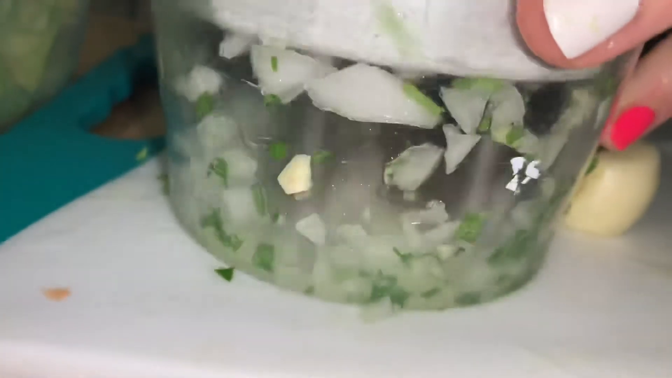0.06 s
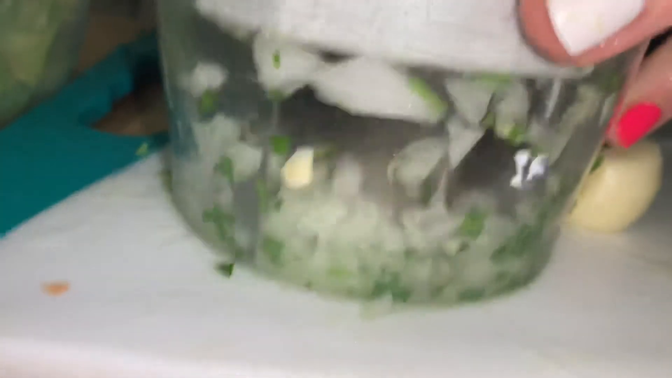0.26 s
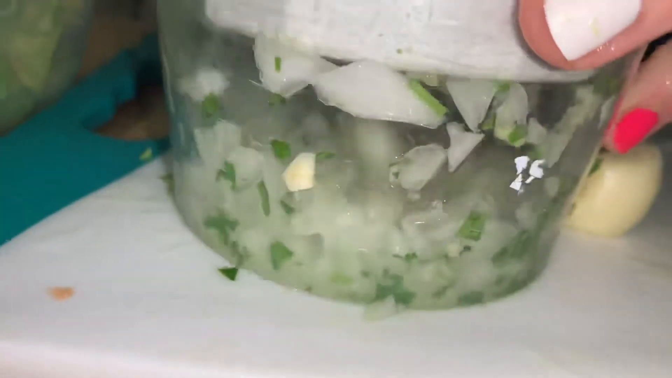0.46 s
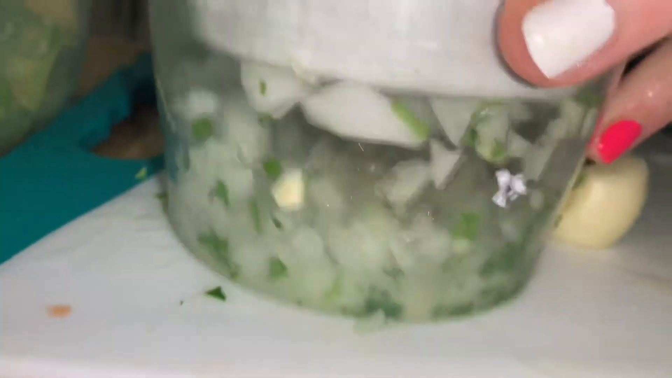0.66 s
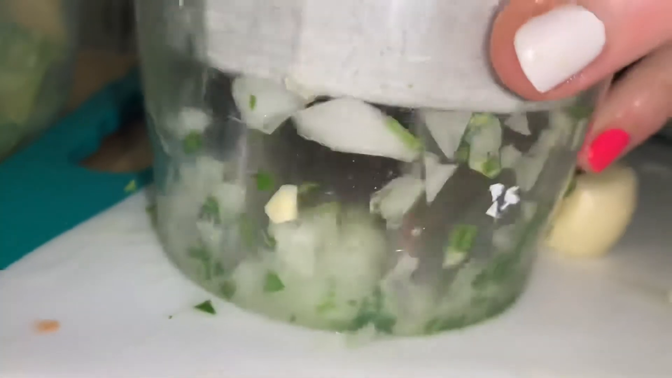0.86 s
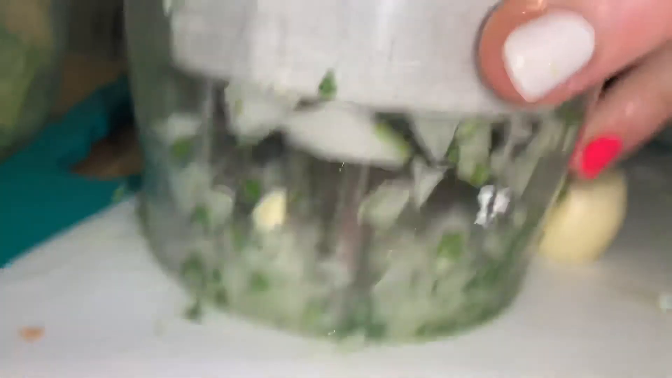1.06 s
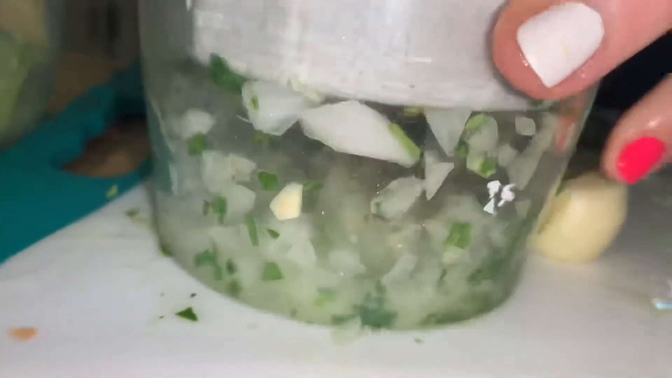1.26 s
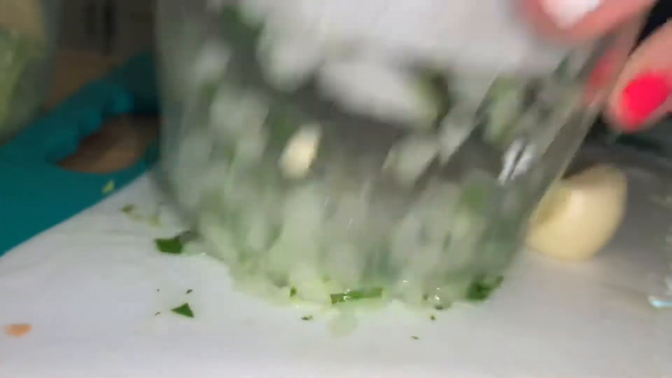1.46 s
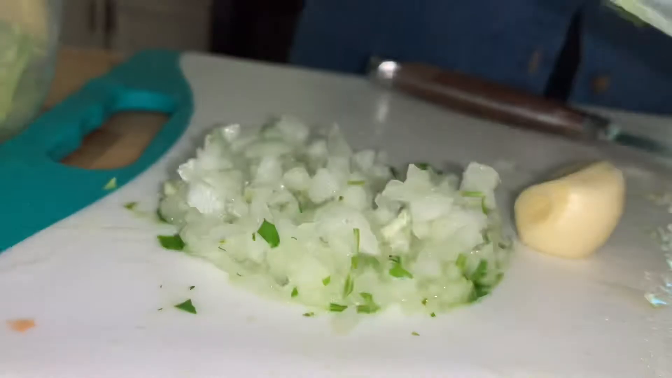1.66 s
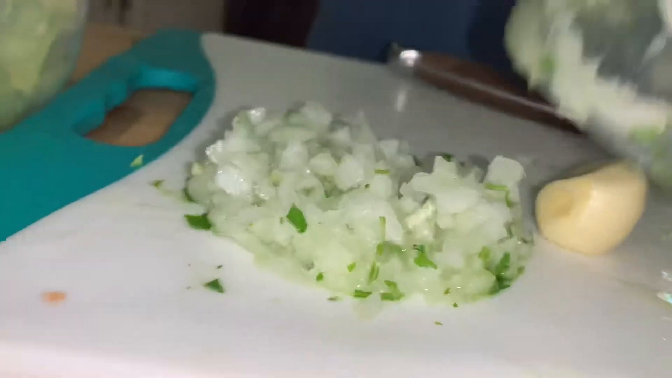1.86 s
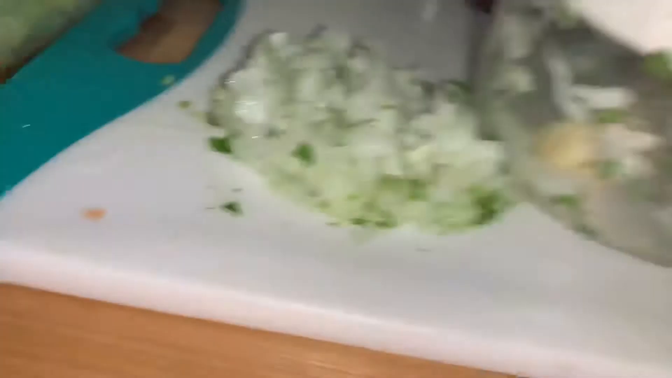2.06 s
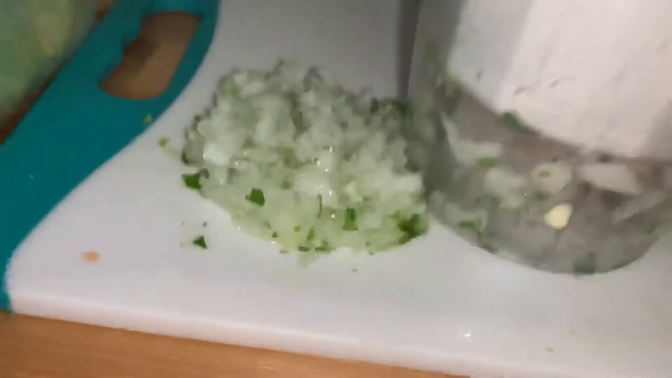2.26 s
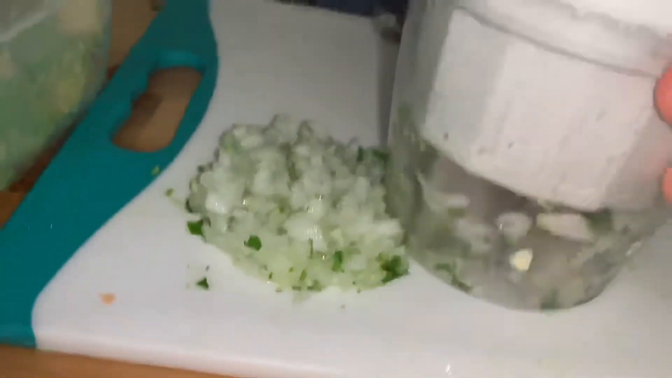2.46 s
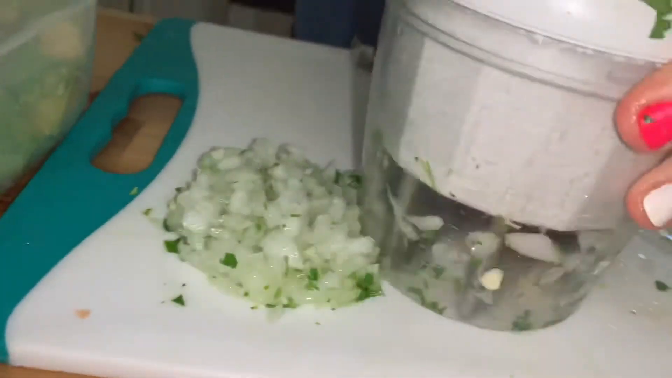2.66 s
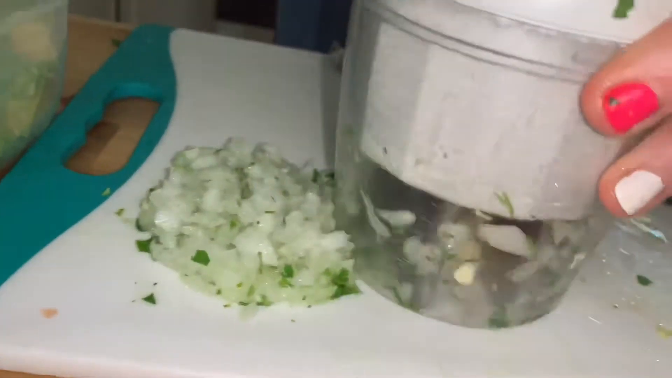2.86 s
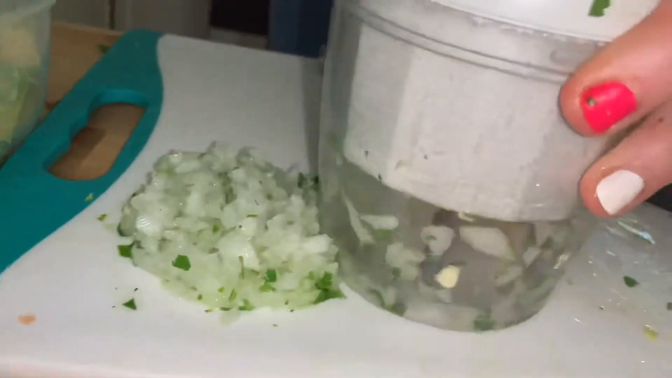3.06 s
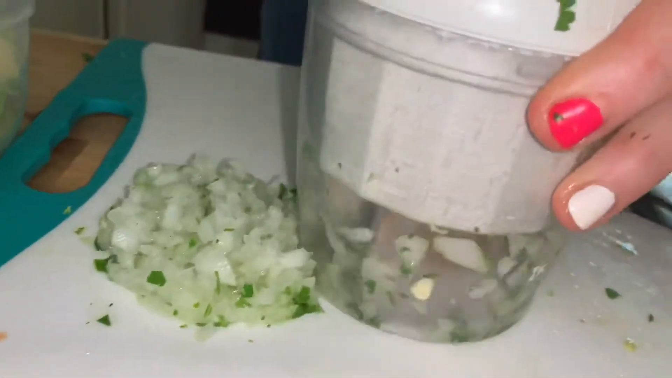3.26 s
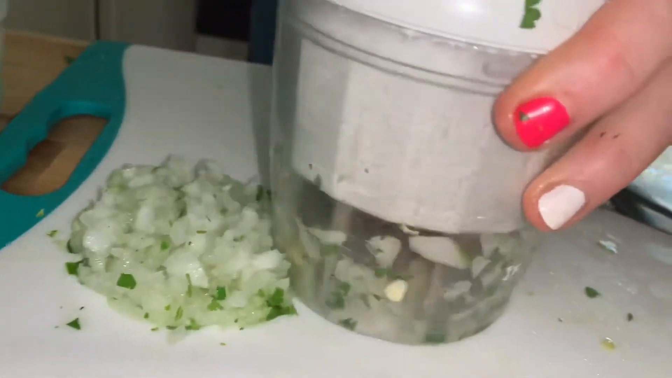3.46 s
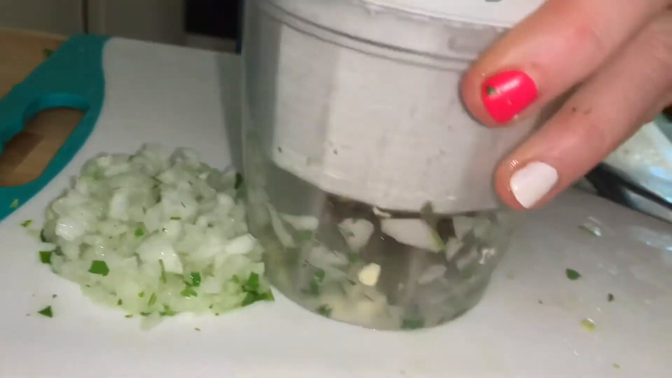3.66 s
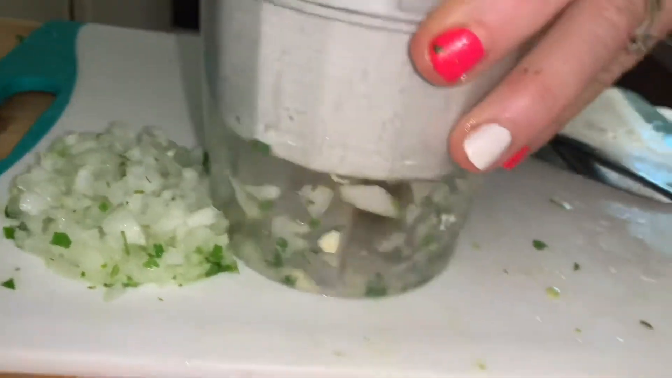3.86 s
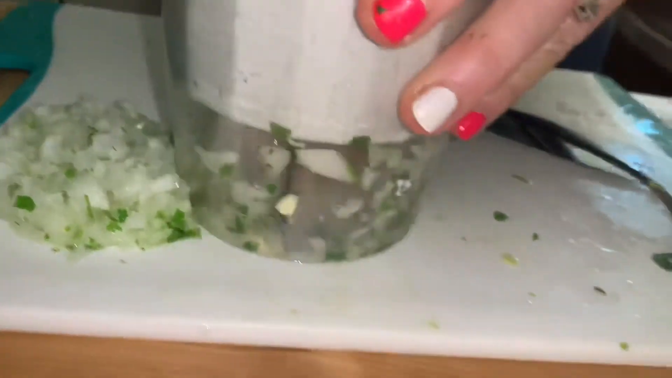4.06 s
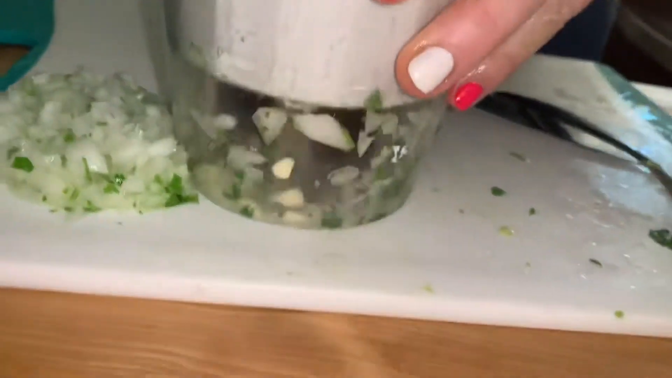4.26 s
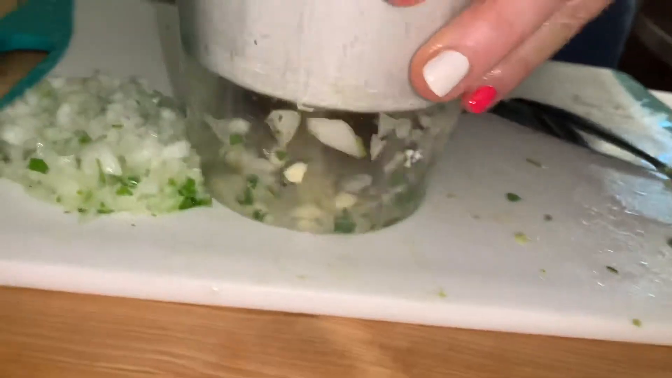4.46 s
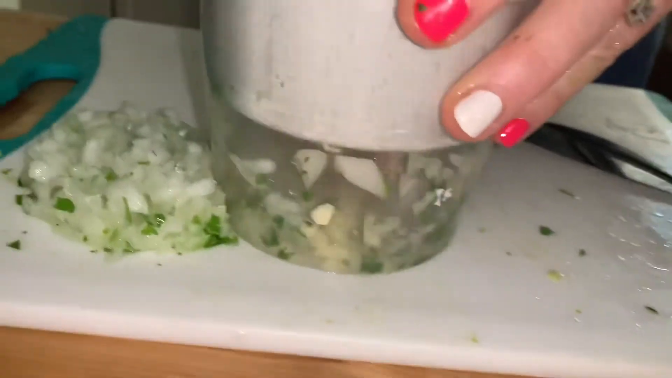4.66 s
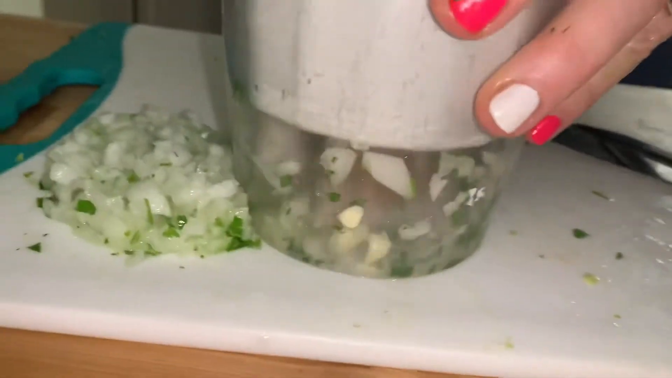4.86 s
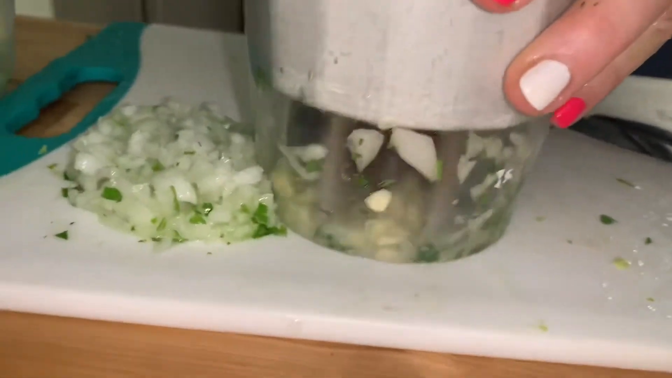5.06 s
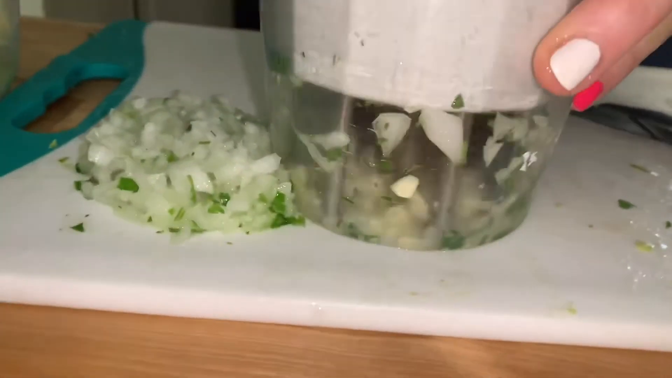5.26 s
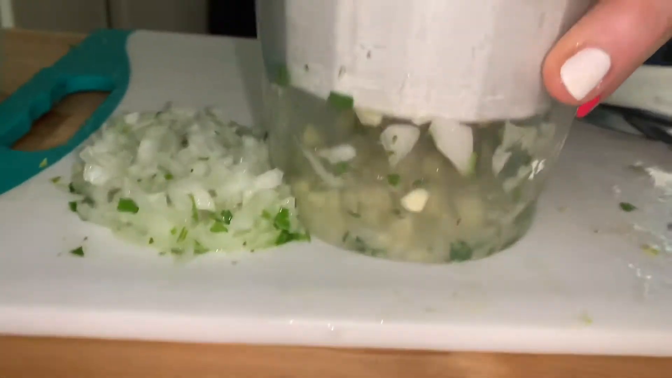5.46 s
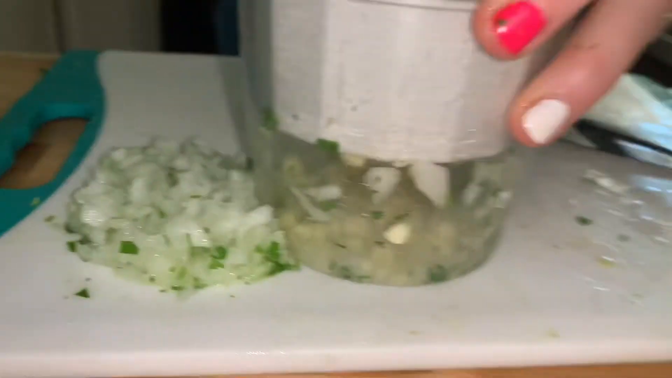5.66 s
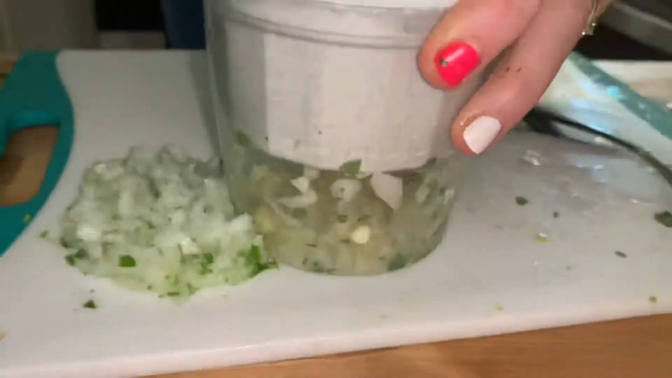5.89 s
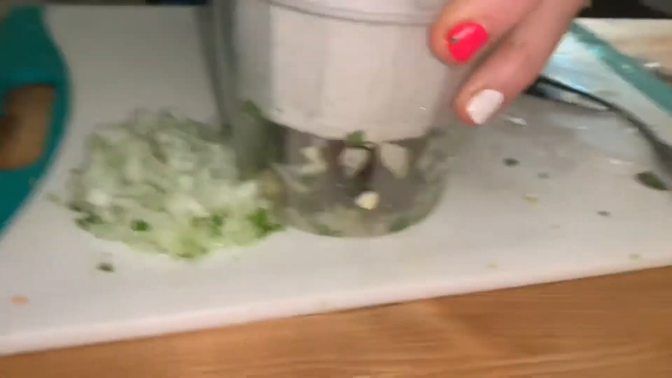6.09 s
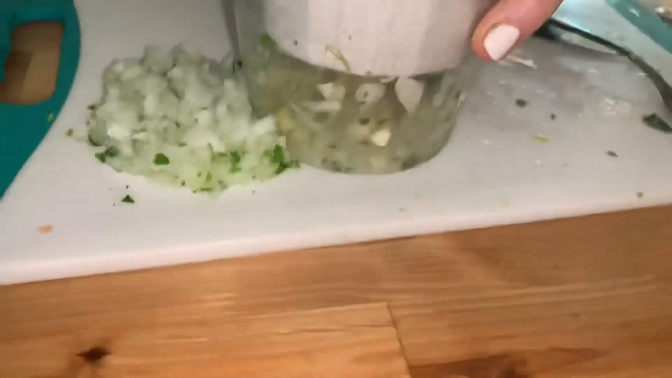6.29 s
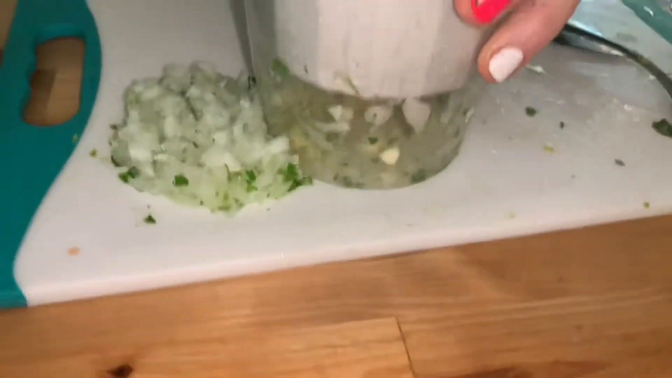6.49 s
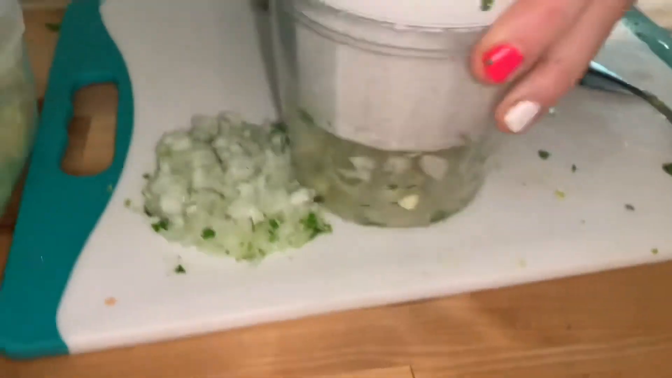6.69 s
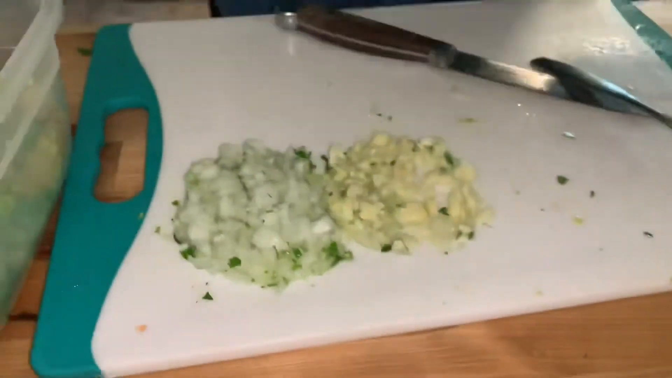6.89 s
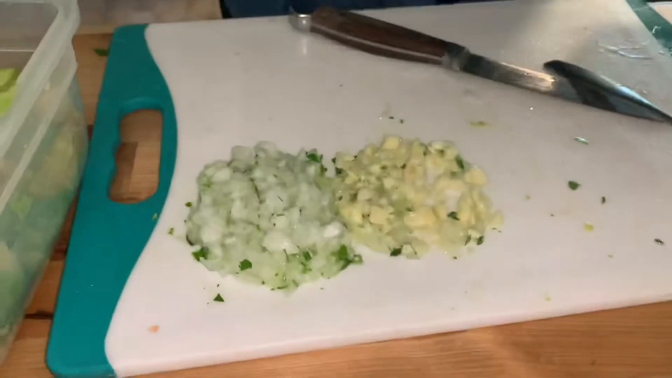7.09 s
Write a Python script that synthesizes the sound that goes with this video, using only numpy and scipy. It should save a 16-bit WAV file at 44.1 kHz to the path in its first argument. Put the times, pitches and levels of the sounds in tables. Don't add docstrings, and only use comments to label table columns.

```python
import sys
import numpy as np
from scipy import signal
from scipy.fft import rfft, irfft, next_fast_len
from scipy.io import wavfile
from scipy.ndimage import uniform_filter1d

SR = 44100
rng = np.random.default_rng(int(sys.argv[2]) if len(sys.argv) > 2 else 0)


def field_ratio(decibels):
    return 10 ** (np.asarray(decibels, dtype=float) / 20)


def store_wav(level_fs):
    pcm = np.round(np.clip(np.atleast_2d(level_fs), -1, 1) * 32767)
    wavfile.write(sys.argv[1], SR, pcm.T.astype(np.int16))


N = 314433
LEAD = SR // 5

# t/s, crack 1-3 kHz level/dB, knock 300-900 Hz level/dB,
# snap over 4 kHz level/dB, board thud level/dB
CHOPS = [(-.045, -18, -16, -22, -9), (0.2145, -16, -11, -22, -9.9), (0.4869, -15, -15, -28, -8.9),
         (0.7498, -16, -14, -25, -8.6), (1.0177, -16, -17, -24, -11.1), (2.2249, -13, -14, -20, -7.7),
         (2.4454, -13, -21, -18, -6.6), (2.6345, -16, -14, -19, -8.2), (2.83, -16, -10, -17, -9.8),
         (3.0246, -12, -16, -18, -8.8), (3.2282, -13, -18, -16, -9.5), (3.4112, -14, -19, -20, -8.4),
         (3.6163, -17, -16, -16, -7.5), (3.8098, -14, -18, -21, -7.8), (4.0089, -16, -11, -20, -11),
         (4.2005, -15, -11, -19, -9.9), (4.384, -18, -10, -19, -8.8), (4.5736, -12, -22, -17, -8.4),
         (4.7662, -13, -24, -21, -9.9), (4.9877, -12, -21, -19, -8.3), (5.2171, -15, -17, -21, -7.5),
         (5.6641, -14, -11, -20, -10.1), (6.0707, -13, -16, -19, -11), (6.5102, -16, -15, -20, -8.8)]
SET_DOWN = (1.959, -27, -23, -38, -20.7)
RETURNS = [(0.0848, -15, -16, -16, -27), (0.3597, -16, -12, -18, -24), (0.6316, -18, -19, -17, -22),
           (0.8925, -18, -18, -22, -25), (1.1813, -19, -16, -17, -29), (2.3048, -26, -25, -21, -35),
           (2.5322, -21, -18, -19, -26), (2.7278, -23, -19, -22, -26), (2.9219, -23, -19, -20, -31),
           (3.1214, -25, -24, -20, -30), (3.3195, -19, -18, -19, -25), (3.5255, -23, -24, -24, -32),
           (3.7121, -23, -27, -25, -30), (3.9081, -20, -23, -20, -23), (4.0977, -27, -30, -29, -33),
           (4.2868, -23, -27, -21, -31), (4.4753, -24, -23, -22, -34), (4.6684, -22, -18, -19, -28),
           (4.8794, -25, -21, -25, -32), (5.0944, -23, -20, -20, -30), (5.3349, -20, -18, -22, -27),
           (5.731, -28, -29, -25, -35), (6.138, -29, -21, -20, -34), (6.5766, -24, -18, -17, -33)]
# palm slap lead t/s, level/dB, cam step lead t/s, level/dB
PUSHES = [(.025, -34, .012, -34), (.0266, -30, .0127, -26), (.0212, -33, .0117, -29),
          (.0212, -27, .012, -45), (.0257, -33, .018, -35), (.0246, -25, .0106, -21),
          (.0246, -29, .0121, -24), (.025, -45, .0127, -25), (.025, -45, .0116, -36),
          (.0236, -36, .0117, -36), (.0272, -32, .0127, -28), (.0201, -38, .0131, -32),
          (.0202, -35, .0072, -24), (.0246, -32, .0101, -29), (.0232, -39, .012, -45),
          (.0242, -32, .0107, -31), (.0241, -41, .0136, -32), (.0251, -39, .0147, -35),
          (.0252, -35, .0162, -34), (.0272, -37, .0162, -37), (.0261, -39, .0166, -38),
          (.0211, -30, .0102, -32), (.0236, -32, .0077, -29), (.0266, -37, .0112, -39)]


def read(points, hz):
    f, value = np.transpose(points)
    return np.interp(np.log(hz + 1), np.log(f + 1), value)


def evened(x):
    return x / np.sqrt(np.mean(x ** 2) + 1e-20)


def add(mix, s, sound):
    part = mix[..., LEAD + round(s * SR):][..., :sound.shape[-1]]
    part += sound[..., :part.shape[-1]]


def shaped_noise(points, channels):
    size = next_fast_len(N + LEAD)
    z = rfft(rng.standard_normal((channels, size)))
    z = z * field_ratio(read(points, np.fft.rfftfreq(size, 1 / SR)))
    return evened(irfft(z, size)[:, :N + LEAD])


def fridge():
    # f/Hz, level/dB
    partials = [(59.2, -80), (118.4, -66), (242.2, -90), (468.3, -90)]
    # t/s, level/dB
    hum_fade = [(0, 0), (2, 0), (5.5, -3), (7.13, -7)]
    # f/Hz, level/dB per Hz
    air_colour = [(25, -36), (45, -16), (70, -6), (120, -3), (165, 1), (260, -6), (400, -15), (700, -21),
                  (1500, -28), (4000, -40), (16000, -68)]
    t = (np.arange(N + LEAD) - LEAD) / SR
    waver_db = 2.5 * evened(uniform_filter1d(rng.standard_normal(len(t)), size=4000))
    level_db = np.interp(t, *np.transpose(hum_fade)) + waver_db
    hum = sum(np.sqrt(2) * field_ratio(db + level_db) * np.sin(2 * np.pi * f * t) for f, db in partials)
    return hum + field_ratio(-75) * shaped_noise(air_colour, channels=2)


def kitchen(x):
    # f/Hz, t60/s
    decay = [(100, .5), (250, .5), (500, .47), (1000, .47), (3000, .47), (6000, .41), (12000, .39)]
    # f/Hz, level/dB
    reflected = [(60, -16), (160, -20), (300, -12), (700, -11.5), (1600, -10), (3000, -11), (5000, -12.5),
                 (14000, -23)]
    taps = np.zeros((2, SR))
    at = np.arange(300, SR - 20, 20) + rng.integers(0, 20, (2, (SR - 301) // 20))
    np.put_along_axis(taps, at, rng.choice([-1., 1.], at.shape), 1)
    hz, t, z = signal.stft(taps, SR, nperseg=512)
    t60 = read(decay, hz)[:, None]
    colour_db = read(reflected, hz)[:, None]
    z = z * field_ratio(colour_db - 60 * t / t60) / np.sqrt(t60 * SR / 276)
    response = signal.istft(z, SR, nperseg=512)[1]
    return signal.fftconvolve(x, response, axes=1)[:, :N + LEAD]


def worktop():
    # t/s, level/dB
    shaking = [(0.0, -46), (1.09, -47), (1.33, -77), (1.83, -77), (2.06, -60), (2.4, -51), (5.22, -51),
               (5.4, -63), (6.6, -63), (6.87, -83), (7.13, -86)]
    # f/Hz, level/dB per Hz
    shaking_colour = [(20, -15), (40, -8), (66, 0), (90, -4), (125, -12), (170, -36), (500, -46),
                      (9000, -62)]
    t = (np.arange(N + LEAD) - LEAD) / SR
    level_db = np.interp(t, *np.transpose(shaking)) + 3.5
    return field_ratio(level_db) * shaped_noise(shaking_colour, channels=2)


def board():
    # f/Hz, level/dB, t60/s
    counter = [(158, -23, .5), (92, -9, .07), (66, -27, .3), (56, -30, .3), (36, -17, .1)]
    # t/s, level/dB, f/Hz
    bumps = [
        (1.21, -40, 62),
        (1.27, -44, 58),
        (1.33, -50, 64),
        (1.853, -46, 95),
        (1.885, -52, 62),
        (6.436, -47, 75),
    ]
    thud_hz, stiffening_hz_per_s = 149, 1.7
    thud_lag_s = .0004
    slap_thud_db, slap_thud_hz = 5, 165
    t = np.arange(SR // 3) / SR
    out = np.zeros(N + LEAD)
    ring = sum(field_ratio(db - 60 * t / t60) * np.sin(2 * np.pi * hz * t) for hz, db, t60 in counter)
    ring = ring * (1 - np.exp(-t / .008))
    for s, *_, thud_db in CHOPS + [SET_DOWN]:
        turns = (thud_hz + stiffening_hz_per_s * s) * t - 1.4 * np.exp(-t / .002)
        envelope = np.minimum(t / .004, 1) ** 1.5 * np.exp(-(t / .0185) ** 3.5)
        swing = envelope * np.cos(2 * np.pi * turns)
        add(out, s + thud_lag_s, field_ratio(thud_db + .1) * (swing + ring))

    pushes = [(chop[0] - push[0], push[1] + slap_thud_db, slap_thud_hz) for chop, push in zip(CHOPS, PUSHES)]
    returns = [(row[0], row[4] - 1.5, 140) for row in RETURNS]
    pulse = (t / .012) * np.exp(1 - t / .012)
    for s, db, hz in returns + bumps + pushes:
        add(out, s, field_ratio(db) * pulse * np.sin(2 * np.pi * hz * t))
    return np.array([out, out])


def ticks():
    # t/s, level/dB, brightness level/dB (snap up, knock
    rattles = [(0.3106, -45, 0), (0.5047, -43, 0), (0.585, -42, -2), (0.6229, -40, 0), (0.8424, -43, -3),
               (1.1377, -42, -6), (1.1976, -27, 3), (1.4106, -70, 8), (1.63, -69, -8), (1.8496, -57, -6),
               (1.9823, -45, 1), (2.0437, -68, 9), (2.1, -65, 12), (2.1514, -66, 10), (2.5086, -42, 3),
               (2.6837, -34, -2), (2.7071, -39, 2), (3.5876, -38, 3), (4.2686, -44, 0), (4.8922, -32, 4),
               (6.1104, -43, 4), (6.5554, -41, 4), (7.0897, -57, 8)]
    slap_offset_db, step_offset_db = (-2, 1, -3), (-2, -6, -2)
    unlock_s, unlock_offset_db = .023, (-23, -25, -31)
    rebound_s, rebound_offset_db = .014, (-14, -20, -15)
    rows = []
    for (s, *_), (slap_s, slap_db, step_s, step_db) in zip(CHOPS, PUSHES):
        rows.append((s - slap_s, *np.add(slap_db, slap_offset_db)))
        rows.append((s - step_s, *np.add(step_db, step_offset_db)))
    for s, *levels_db, _ in RETURNS:
        rows.append((s - unlock_s, *np.add(levels_db, unlock_offset_db)))
        rows.append((s + rebound_s, *np.add(levels_db, rebound_offset_db)))
    return rows + [(s, db, db - bright_db, db + bright_db) for s, db, bright_db in rattles]


def clatter(rows, shape, scrape_db, grit_db=4.5):
    after_tilt_db = (0, -2, -3.5)
    first_blow = 3.5
    rise, *t60s, after_db, after_t60 = shape
    t = np.arange(-600, 3400) / SR
    late = np.maximum(t, 0)
    scrape = field_ratio(scrape_db) * np.exp(np.minimum(t, 0) / .004) * (t < 0)
    attack = np.clip(1 + t / (3 * rise), 0, 1) ** 2 + scrape
    decay = field_ratio(-60 * late / np.array(t60s)[:, None])
    after_rattle = field_ratio(after_db + np.array(after_tilt_db)[:, None] - 60 * late / after_t60)
    fall = attack * (decay + after_rattle) * signal.windows.tukey(len(t), .12)

    chance = rng.standard_normal((len(rows), 3, len(t)))
    drive = np.zeros((3, 2, N + LEAD))
    for (s, *levels_db), (a, b, lumps) in zip(rows, chance):
        grit = field_ratio(grit_db * evened(uniform_filter1d(lumps, size=40)))
        impacts = np.array([a, b]) * grit + first_blow * (t == 0)
        energy = np.sum((fall[0] * impacts) ** 2, axis=1, keepdims=True)
        impacts = impacts / np.sqrt(energy / np.sum(fall[0] ** 2))
        bands = field_ratio(np.array(levels_db[:3]))[:, None] * fall
        add(drive, s + t[0] + rise / 2, bands[:, None] * impacts)
    return drive


def cup_wall(points):
    # f/Hz, width f/Hz, level/dB
    modes = [(470, 110, 3), (625, 110, 3), (830, 120, 3), (1030, 140, 4), (1500, 200, 4), (2050, 200, 2),
             (3000, 300, 2), (4200, 400, 3)]
    hz = np.abs(np.fft.fftfreq(4096, 1 / SR))
    outside = (hz < points[0][0]) | (hz > points[-1][0])
    db = np.where(outside, -60, read(points, hz))
    db = db + sum(peak_db / (1 + (2 * (hz - f) / width) ** 2) for f, width, peak_db in modes)
    log_gain = np.log(field_ratio(uniform_filter1d(db, size=3, mode="wrap")))
    taps = np.fft.ifft(np.exp(signal.hilbert(log_gain).conj())).real[:2048]
    return taps / np.linalg.norm(taps)


def chopper():
    # rise t/s, t60/s of crack, knock and snap, after-rattle level/dB, its t60/s
    chop_shape = (.0012, .038, .028, .019, -14, .14)
    return_shape = (.0011, .033, .026, .021, -12, .1)
    tick_shape = (.001, .035, .045, .02, -13, .09)
    # f/Hz, level/dB
    crack = [(600, -25), (1000, -3), (1700, -2), (2600, -4.5), (3500, -7), (4500, -22)]
    knock = [(120, -20), (250, 0), (420, 0), (800, -7), (1200, -25)]
    snap = [(2500, -22), (3600, 0), (6500, -4), (8600, -6), (10500, -4), (12500, -9), (15700, -12),
            (16200, -40)]
    drive = clatter(CHOPS + [SET_DOWN], chop_shape, scrape_db=-13)
    drive = drive + clatter(RETURNS, return_shape, scrape_db=-18)
    drive = drive + clatter(ticks(), tick_shape, scrape_db=-20)
    out = np.zeros((2, N + LEAD))
    for band_drive, band in zip(field_ratio(2.5) * drive, (crack, knock, snap)):
        out += signal.oaconvolve(band_drive, cup_wall(band)[None])[:, :N + LEAD]
    return out


def scene():
    dry = chopper() + board()
    return (dry + kitchen(dry) + worktop() + fridge())[:, LEAD:]


def top_cut(x):
    return signal.sosfilt(signal.butter(12, 16960, fs=SR, output="sos"), x)


def record(dry):
    # f/Hz, coherence 0-1
    likeness = [(60, .93), (170, .98), (520, .88), (800, .7), (1400, .3), (2500, .45), (5200, .35),
                (6500, .5), (7700, .97), (8300, .997), (16000, .995)]
    # f/Hz, level/dB
    left_over_right = [(170, 1), (500, 3.5), (900, 5), (1700, 4), (2700, 0), (5200, -4), (7500, 0),
                       (16000, 0)]
    # f/Hz, phase/rad
    port_turn = [(60, .35), (170, .55), (500, 1.3), (1000, .1), (2200, .9), (6500, 1.85)]
    port_lag_s = 9.2 / SR
    size = next_fast_len(N + 1000)
    hz = np.fft.rfftfreq(size, 1 / SR)
    first, second = rfft(dry, size)
    like = np.clip(read(likeness, hz), 0, 1)
    tilt = field_ratio(read(left_over_right, hz) / 2)
    turn = np.exp(1j * (2 * np.pi * hz * port_lag_s - read(port_turn, hz)))
    left = first * tilt
    right = (like * turn * first + np.sqrt(1 - like ** 2) * second) / tilt
    ports = irfft(np.array([left, right]), size)[:, :N]
    return top_cut(1.05 * np.tanh(ports / 1.05))


dry = scene()
out = record(dry)
store_wav(out)
```